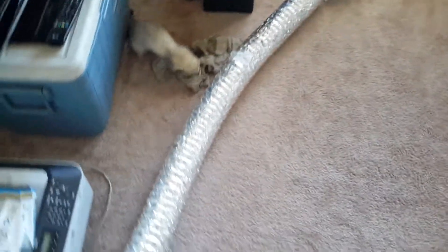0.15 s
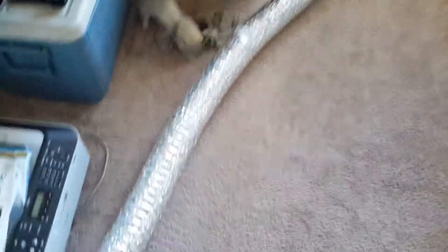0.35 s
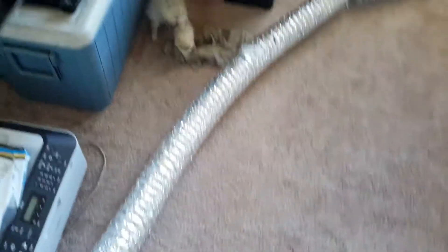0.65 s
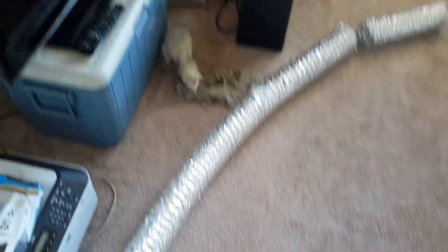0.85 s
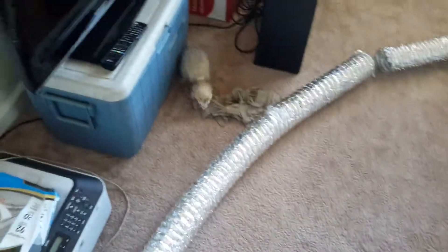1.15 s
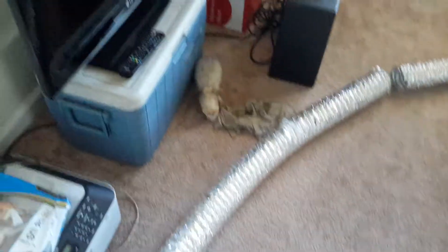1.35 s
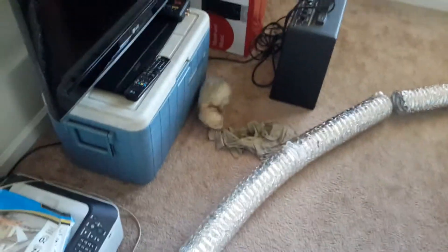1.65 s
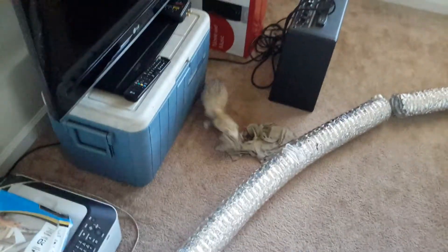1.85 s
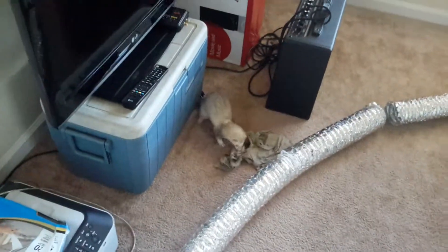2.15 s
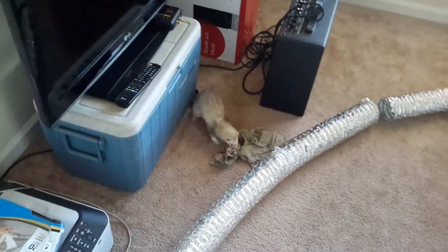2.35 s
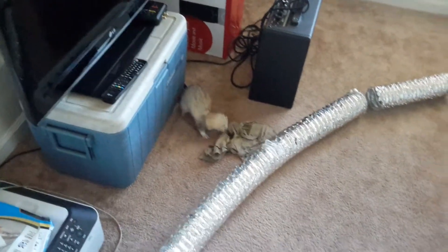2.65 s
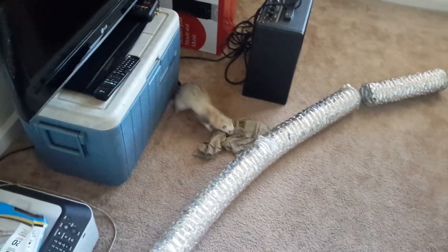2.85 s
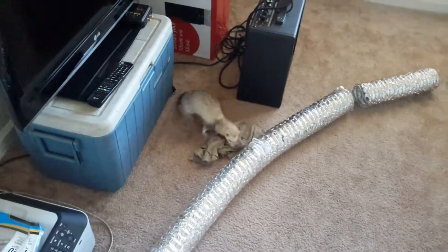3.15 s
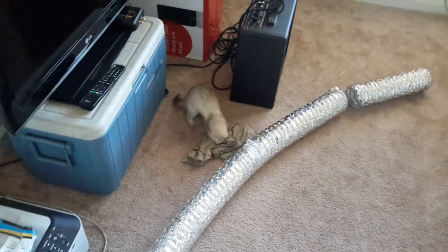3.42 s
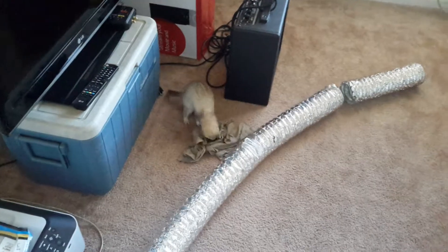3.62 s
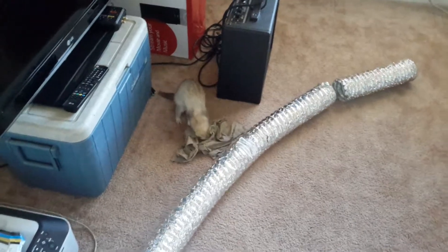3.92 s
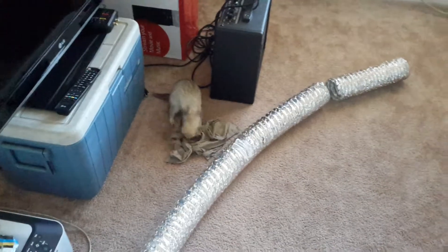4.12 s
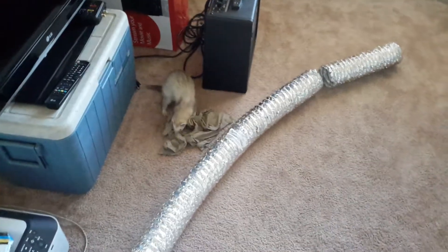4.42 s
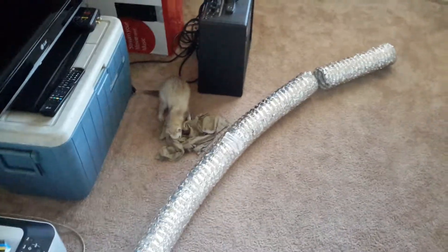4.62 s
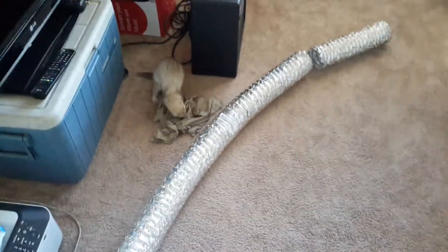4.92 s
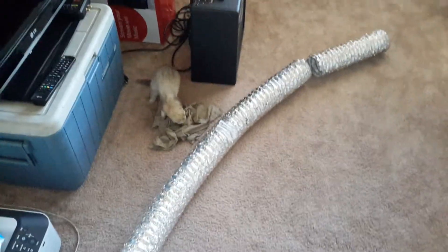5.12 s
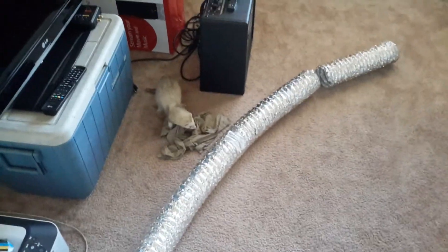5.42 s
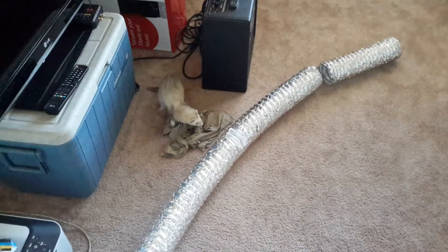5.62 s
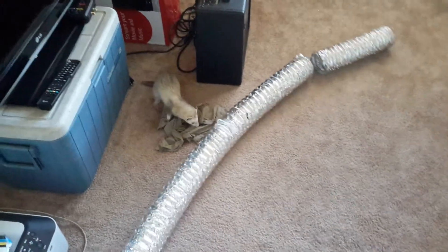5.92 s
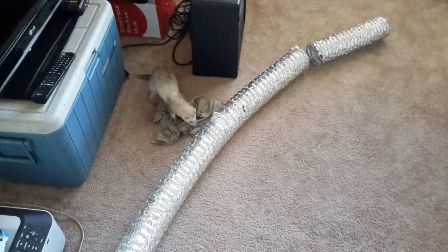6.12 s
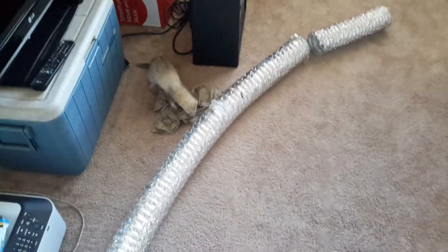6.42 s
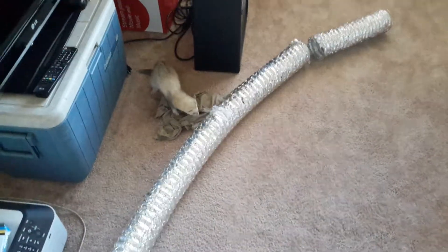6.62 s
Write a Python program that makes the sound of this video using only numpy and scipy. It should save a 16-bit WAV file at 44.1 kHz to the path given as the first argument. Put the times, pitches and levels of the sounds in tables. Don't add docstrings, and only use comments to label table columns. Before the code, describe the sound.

In a small carpeted room, a phone a couple of metres away picks up animals moving in flexible foil ducting. For the first 0.7 seconds it is almost silent, with only very faint ticks. From 0.8 seconds air hiss rises and crisp foil snaps begin, with a cluster at 1.0 and brighter pops near 1.4. A very sharp crack lands at 1.9 and another strong, lower pop at 2.3. Dense crinkles, high tinny clicks and soft hollow paw thumps continue irregularly until about 3.9, with a slight drag on carpet, then thin to fine rustling by 4.4. The hiss drops and near silence lasts until 5.5. A second scramble starts, with a loud hard double crack around 5.65, lighter pops near 5.9, then scattered crackles and rustling from 6.2 to the end. Each snap has quick reflections and a short room tail.

```python
import sys
import numpy as np
from scipy import signal
from scipy.fft import rfft, irfft
from scipy.io import wavfile

SR = 44100
rng = np.random.default_rng(int(sys.argv[2]) if len(sys.argv) > 2 else 0)


def convert_level_to_amplitude(level_db):
    exponent = np.asarray(level_db, float) / 20
    return 10 ** exponent


def wrap_up_sound(samples):
    columns = np.atleast_2d(samples).T
    tamed = np.clip(columns, -1, 1)
    steps = np.round(tamed * 32767).astype(np.int16)
    wavfile.write(sys.argv[1], SR, steps)


N = 298557

# [f/Hz, density/dB]
FOIL_SPECTRUM = [(400, -31.5), (700, -18.5), (1950, -10.5), (2980, -6.5), (4110, -8), (5200, -6.5),
                 (6300, -6), (7900, -0.5), (9800, -11), (12100, -19), (14100, -36), (15500, -57)]
# [t/s, peak level/dB, room share/dB]
CRACKS = [(0.376, -46, 1), (0.7205, -31.5, 7.5), (0.7504, -18.5, 7.5), (0.8079, -19.5, 9.5),
          (0.91, -25.5, 13.5), (0.992, -14.5, -2.5), (0.999, -24, -6), (1.366, -8.5, 3), (1.379, -7.5, 8.5),
          (1.5732, -10, -0.5), (1.657, -17.5, 9), (1.8301, -26, 14.5), (1.9387, 1.5, -3.5),
          (1.9494, -19, -15), (2.0524, -16.5, 10.5), (2.587, -15, 5), (2.628, -6.5, -0.5),
          (3.022, -21, 2.5), (3.5458, -20, 12.5), (3.895, -15.5, 8), (4.186, -25.5, 5), (5.6562, 0, 0.1),
          (5.663, -2.5, -6), (6.114, -31, 6), (6.151, -29, 2), (6.2015, -20, 0.5), (6.3005, -24.5, 5.5),
          (6.354, -14.5, 0), (6.4428, -19.5, 0.5), (6.5238, -15, 4)]
CRACK_HZ, CRACK_NOTE_DB = 5600, -13.5
# [t/s, peak level/dB, f/Hz, note share/dB]
PANELS = [(0.5112, -37.5, 2240, -9), (.8057, -20, 2640, -13), (.9838, -17.5, 2840, -10),
          (1.0006, -15, 2880, -7), (1.1907, -33, 1480, 11), (1.3595, -17.5, 2900, 10.5),
          (2.2196, -23.5, 3380, 11), (2.2913, -2.5, 2140, 5.5), (2.3006, -5.5, 2360, -18),
          (2.4639, -20, 2900, 5.5), (2.61, -19, 1000, 6), (2.847, -24, 1040, 18.5),
          (2.967, -16.5, 3720, -1.5), (3.2487, -22, 2730, 3.5), (3.267, -22, 4080, 1),
          (3.5121, -16.5, 3870, 4.5), (3.6403, -20, 3850, -17), (3.9109, -14, 1640, -11),
          (4.0428, -26, 4390, 9), (4.127, -20, 4400, -4), (4.2098, -22, 3160, -5),
          (4.5488, -33, 2360, -0.5), (5.2998, -40, 3220, -10.5), (5.491, -27, 2860, 5),
          (5.526, -21.5, 2550, 2), (5.6, -26.5, 1503, 23), (5.602, -23, 2760, 6), (5.6568, -9, 3530, -6),
          (5.93, -24.5, 2980, 12), (6.4512, -22.5, 3800, 8.5)]
PANEL_ROOM_DB = 2
# [t/s, peak level/dB, f/Hz, room share/dB]
PLEATS = [(.333, -54, 5840, 7), (0.8239, -17, 5900, 4), (.9999, -13, 6200, 4.5), (1.311, -23, 5270, 2.5),
          (1.3898, -13.5, 6200, 1), (1.44, -13, 6300, -3), (1.712, -8.5, 5060, 4),
          (1.7298, -20.5, 6000, 6.5), (2.0129, -15, 5450, 5), (2.065, -26, 4850, -9),
          (2.0866, -14, 7300, -1), (2.106, -15.5, 6470, -0.7), (2.4457, -31, 5490, 9.5),
          (2.6322, -14, 6000, 7.5), (2.703, -11, 4700, 1.5), (2.7337, -20, 5280, -12),
          (2.7794, -15, 4630, 8), (2.7857, -14.5, 6600, 6), (2.89, -20, 6450, 0.5), (3.087, -23, 5400, 10),
          (3.121, -20, 6200, 2.5), (3.2809, -19, 4770, 7), (3.4262, -14.5, 5800, 1.5),
          (3.673, -17, 5540, 2), (3.6932, -8, 4440, -0.5), (3.7608, -21.5, 4700, 9),
          (3.8691, -13, 4950, -1), (5.8487, -23, 4700, 8), (5.923, -20.5, 5640, 3.5),
          (6.2353, -21.5, 5160, 7.5)]
PLEAT_NOTE_DB = 0.26
# [t/s, peak level/dB]
TICKS = [(.1655, -61), (.628, -60), (0.6664, -44), (2.0185, -20), (2.566, -29), (2.582, -18), (2.6453, -28),
         (2.694, -35), (3.0721, -21), (3.2215, -32), (3.389, -27), (3.8432, -33), (4.0766, -19),
         (4.334, -33), (4.7623, -58), (5.032, -43.5), (5.3677, -49), (5.3802, -45), (5.391, -44),
         (5.519, -21.5), (5.5745, -33), (5.8553, -24), (6.392, -25), (0.674, -47), (1.564, -17.5),
         (2.4455, -28), (5.8478, -25.5), (3.6375, -28), (1.3101, -27), (6.5783, -43)]
TICK_NOTE_DB, TICK_ROOM_DB, TICK_HZ, TICK_SPREAD = -2, 1, 5600, .12

# [t/s, peak level/dB, tube note f/Hz]
THUMPS = [(0.91, -45, 725), (1.006, -38, 510), (1.31, -47, 775), (1.365, -27.5, 510), (1.585, -48, 445),
          (1.689, -49.5, 370), (1.711, -28.5, 555), (1.885, -38.5, 373), (1.937, -37, 316),
          (1.986, -32.5, 426), (2.067, -39, 291), (2.169, -41, 205), (2.291, -27.5, 480),
          (2.467, -39.5, 510), (2.608, -27, 594), (2.637, -23.5, 357), (2.779, -32, 437),
          (2.951, -34.5, 382), (3.265, -35, 825), (3.425, -42.5, 557), (3.508, -32.5, 564),
          (3.635, -45, 780), (3.758, -29, 313), (3.801, -37.5, 350), (5.594, -35.5, 940), (5.654, -27, 905),
          (5.848, -50, 380), (5.922, -44, 513), (6.175, -43.5, 450), (6.245, -45, 640)]

# [t/s, crinkle level/dB, hold/s, weight on the carpet/dB]
STRIDES = [(0.806, -62, 0.045, -30), (.92, -61, .01, -20), (0.996, -35, .01, -11.5),
           (1.365, -43.5, 0.04, -2), (1.573, -30.5, 0.0041, -38), (1.7, -28, 0.0056, -13.5),
           (1.942, -35, .12, -18.5), (2.071, -31.5, .005, -13.5), (2.225, -40.5, .04, -13),
           (2.294, -36.5, 0.0059, -8), (2.468, -32.5, 0.0045, -25), (2.579, -33.5, 0.11, -14),
           (2.694, -38.5, 0.038, -8), (2.796, -33, 0.019, -8), (3.006, -44, 0.065, -7.5),
           (3.081, -43, 0.0042, -4.5), (3.25, -40.5, 0.034, -12.5), (3.423, -37, .08, -15),
           (3.527, -40, 0.13, -15), (3.69, -41, 0.15, -12.5), (3.85, -49, 0.074, -3.5),
           (4.55, -64, 0.0046, -6), (5.57, -42, 0.072, -13), (5.65, -38.5, .005, -9),
           (5.855, -35, .005, -19.5), (5.928, -40.5, 0.051, -17.5), (6.18, -53.5, 0.045, 1),
           (6.3, -48, 0.037, -27), (6.462, -39.5, 0.095, -15.5), (6.601, -43, 0.092, -21)]
FLEX_DB_PER_S, SETTLE_DB_PER_S, DRAG_SETTLE_DB_PER_S = 898.5, 171.5, 122.5
MID_DB, MID_PER_WEIGHT = 6, 0.59
# [t/s, crinkle level/dB, weight on the carpet/dB]
STIRRING = [(0, -72, -14.5), (.4, -66.5, -9.5), (.7, -61.5, -12), (1.1, -53.5, -2.5), (1.28, -81, -9),
            (1.4, -49, -7), (4.0, -44.5, -15), (4.3, -42, -18), (4.43, -43, -25.5), (4.53, -62.5, -6.5),
            (4.66, -68, -12.5), (4.84, -79.5, -15), (5.35, -72.5, -6.5), (5.45, -51.5, -17),
            (5.8, -48.5, -16), (6.05, -43.5, -18), (6.7, -48, -17), (6.77, -57, -30)]
STIR_MID_DB = -4
# [f/Hz, density/dB]
DRAG_SPECTRUM = [(53, -62), (90, -13.5), (157, 1.5), (378, -0.5), (416, -1.5), (1050, -6.5), (1190, -11.5),
                 (1500, -22), (1950, -47.5), (3300, -120)]

# [delay t/s, level/dB]
ECHOES = [(.0012, -8), (.0036, -4), (.0074, -8.5), (.0115, -27), (.0160, -7.5), (.0240, -13)]
ROOM_T60_S, ROOM_DB, ROOM_RISE_S = 0.31, -21.5, 0.0058
BURST_S = 0.00058
TAIL = 12288

# [f/Hz, density/dB]
HUSH_SPECTRUM = [(60, -50), (150, -20), (500, -14.5), (900, -14), (1670, -29.5), (2800, -13.5),
                 (6000, -10.5), (7900, -8.5), (9300, -13.5), (13800, -19), (15500, -39)]
HUSH_DB = -52
# [f/Hz, level/dB]
HUM = [(59.5, -82), (116, -77)]
# [f/Hz, density/dB]
RUMBLE_SPECTRUM = [(20, -14), (45, -14), (120, -7.5), (200, -11.5), (400, -53.5)]
RUMBLE_DB, OFFSET = -74, -.00055
# [f/Hz, density/dB]
CIRCUIT_SPECTRUM = [(150, -20), (300, -1.5), (1400, -4), (3500, -18), (8000, 4.5), (11000, -4), (15500, -7)]
CIRCUIT_DB = -72
# [from t/s, to t/s]
GATE_OPEN = [
    (.79, 4.42),
    (5.52, 7.5),
]
OPEN_DB, SHUT_DB, OPENING_DB_PER_S, SHUTTING_DB_PER_S = 1.5, -30, 126, 159

MIC_HZ, MIC_WIDTH_HZ, MIC_DB = 7740, 750, -3
PARTINGS = [.75, 1.385, 2.30, 2.80, 4.11, 4.41, 5.68, 6.59]


def level(x, db):
    return x * convert_level_to_amplitude(db) / np.sqrt(np.mean(x ** 2))


def colour(x, points):
    hz, db = np.transpose(points)
    grid = np.maximum(np.fft.rfftfreq(4096, 1 / SR), 1)
    log_gain = np.interp(np.log(grid), np.log(hz), db) * np.log(10) / 20
    cepstrum = irfft(log_gain)
    cepstrum[1:2048] *= 2
    cepstrum[2049:] = 0
    impulse = irfft(np.exp(rfft(cepstrum)))
    return signal.fftconvolve(x, impulse)[:len(x)]


def band(x, lo_hz, hi_hz):
    return signal.sosfilt(signal.butter(2, [lo_hz, hi_hz], "bandpass", fs=SR, output="sos"), x)


def ring(x, hz, width_hz):
    return signal.lfilter(*signal.iirpeak(hz, hz / width_hz, fs=SR), x)


def add(out, s, sound):
    i = int(s * SR)
    out[i:i + len(sound)] += sound[:N - i]


def room(chance, wet_db=0., grain_db=0.5):
    t = np.arange(TAIL) / SR
    lumpy = convert_level_to_amplitude(grain_db * np.repeat(chance[1, ::96], 96))
    build_up = 1 - np.exp(-t / ROOM_RISE_S)
    shape = convert_level_to_amplitude(ROOM_DB) * lumpy * build_up * convert_level_to_amplitude(-60 * t / ROOM_T60_S)
    burst = np.exp(-t[:256] / BURST_S)
    for k, (s, db) in enumerate(ECHOES):
        i = int(s * SR * (1 + .12 * np.tanh(chance[1, 3 * k + 1])))
        shape[i:i + len(burst)] += burst * convert_level_to_amplitude(db - 10.0 + 1.1 * chance[1, 3 * k + 2])
    shape *= convert_level_to_amplitude(wet_db)
    direct = burst * chance[0, :len(burst)]
    heard = shape * chance[0]
    heard[:len(burst)] += 0.7 * direct / np.abs(direct).max()
    return heard


def snaps():
    out = np.zeros(N)
    tick_hz = TICK_HZ * (1 + TICK_SPREAD * rng.standard_normal(len(TICKS)))
    pops = [(s, db, CRACK_HZ, CRACK_NOTE_DB, wet_db) for s, db, wet_db in CRACKS]
    pops += [(s, db, hz, note_db, PANEL_ROOM_DB) for s, db, hz, note_db in PANELS]
    pops += [(s, db, hz, PLEAT_NOTE_DB, wet_db) for s, db, hz, wet_db in PLEATS]
    pops += [(s, db, hz, TICK_NOTE_DB, TICK_ROOM_DB) for (s, db), hz in zip(TICKS, tick_hz)]
    for s, db, hz, note_db, wet_db in pops:
        heard = room(rng.standard_normal((2, TAIL)), wet_db)
        note = convert_level_to_amplitude(note_db + 2.5) * ring(heard, hz, 0.4 * hz)
        add(out, s, convert_level_to_amplitude(db) * (heard + note))
    return colour(out, FOIL_SPECTRUM) * convert_level_to_amplitude(7.0)


def thumps():
    out = np.zeros(N)
    t = np.arange(4096) / SR
    for s, db, hz in THUMPS:
        chance = rng.standard_normal((3, TAIL))
        push = chance[2, :len(t)] * np.exp(-t / 0.0087)
        knock = ring(push, hz, 0.27 * hz) + 0.29 * band(push, 180, 1100)
        knock = knock + 0.42 * signal.fftconvolve(knock, room(chance))[:len(t)]
        add(out, s, knock * convert_level_to_amplitude(db) / np.abs(knock).max())
    return out


def crinkle():
    creases = np.zeros(N)
    for hz in 1200 * 1.5 ** np.arange(7):
        creases += ring(crackle(per_s=350., spread_db=5.0), hz, 1.0 * hz) / np.sqrt(hz)
    creases = colour(creases, FOIL_SPECTRUM)
    reverberant = signal.fftconvolve(creases, room(rng.standard_normal((2, TAIL))))[:N]
    creases = 0.45 * creases + .5 * reverberant
    top = level(band(creases, 5600, 18000), 0)
    mid = level(band(creases, 1000, 8700), 0)
    drag = level(colour(crackle(per_s=400., spread_db=0.0), DRAG_SPECTRUM), 0)
    top_gain = flexing(0, SETTLE_DB_PER_S)
    mid_gain = convert_level_to_amplitude(MID_DB) * flexing(MID_PER_WEIGHT, SETTLE_DB_PER_S, STIR_MID_DB)
    drag_gain = flexing(0.99, DRAG_SETTLE_DB_PER_S)
    return top_gain * top + mid_gain * mid + drag_gain * drag


def crackle(per_s, spread_db):
    chance = rng.random((3, N))
    size_db = np.minimum(-spread_db * np.log(chance[2] + 1e-9), 4 * spread_db)
    released = chance[0] < per_s / SR
    return released * np.sign(chance[1] - .5) * convert_level_to_amplitude(size_db)


def flexing(share, settle_db_per_s, stir_db=0.):
    t = np.arange(0, N, 32) / SR
    s, db, weight_db = np.transpose(STIRRING)
    power = convert_level_to_amplitude(np.interp(t, s, db + share * weight_db) + stir_db) ** 2
    for s, db, hold, weight_db in STRIDES:
        before_db = FLEX_DB_PER_S * np.maximum(s - t, 0)
        after_db = settle_db_per_s * np.maximum(t - s - hold, 0)
        power = power + convert_level_to_amplitude(db + share * weight_db - before_db - after_db) ** 2
    return np.interp(np.arange(N) / SR, t, np.sqrt(power))


def hush():
    t = np.arange(N) / SR
    gate_db = automatic_gain_db(t)
    air = level(colour(rng.standard_normal(N), HUSH_SPECTRUM), HUSH_DB)
    hum = sum(convert_level_to_amplitude(db) * np.sqrt(2) * np.sin(2 * np.pi * hz * t) for hz, db in HUM)
    rumble = level(colour(rng.standard_normal(N), RUMBLE_SPECTRUM), RUMBLE_DB)
    bass = hum + rumble + OFFSET
    circuit = level(colour(rng.standard_normal(N), CIRCUIT_SPECTRUM), CIRCUIT_DB)
    return air * convert_level_to_amplitude(gate_db) + bass * convert_level_to_amplitude(0.36 * gate_db) + circuit


def automatic_gain_db(t):
    down_db = np.min([OPENING_DB_PER_S * np.maximum(start - t, 0) + SHUTTING_DB_PER_S * np.maximum(t - end, 0)
                      for start, end in GATE_OPEN], axis=0)
    return np.maximum(OPEN_DB - down_db, SHUT_DB)


def scene():
    tube = band(thumps() + crinkle(), 170, 11000)
    mono = snaps() + tube + hush()
    return np.array([mono, mono])


def band_limit(x):
    return signal.sosfilt(signal.butter(12, 14950, fs=SR, output="sos"), x)


def record(dry):
    heard = dry[0] + convert_level_to_amplitude(MIC_DB) * ring(dry[0], MIC_HZ, MIC_WIDTH_HZ)
    t = np.arange(N) / SR
    apart = sum(np.clip(1 - np.abs(t - s) / .02, 0, 1) for s in PARTINGS)
    trace = convert_level_to_amplitude(-14) * apart * np.roll(band(heard, 300, 14000), 200)
    return band_limit(np.array([heard + trace, heard - trace]))


dry = scene()
out = record(dry)
wrap_up_sound(out)
```